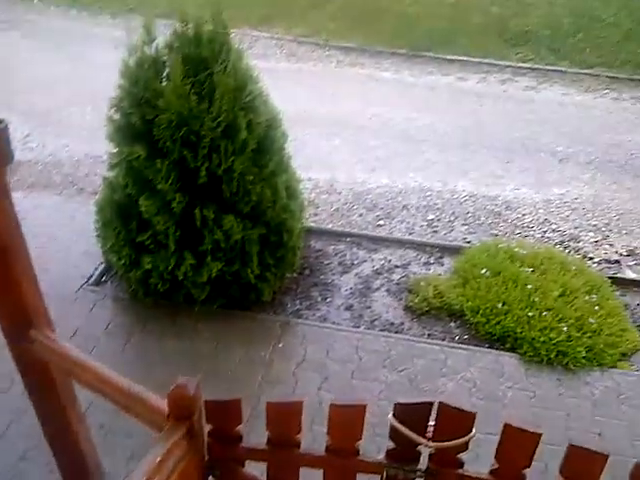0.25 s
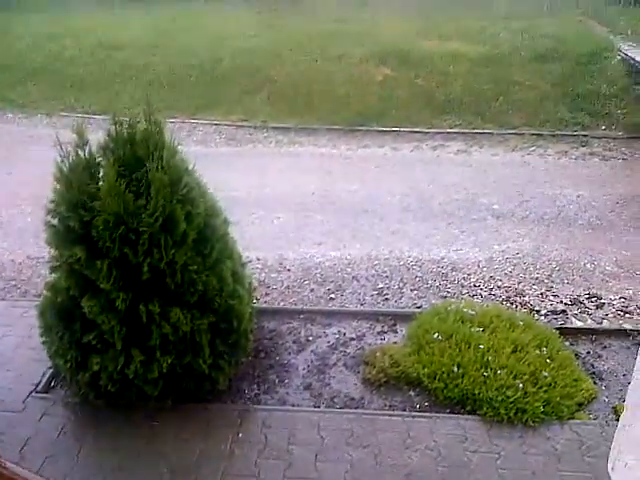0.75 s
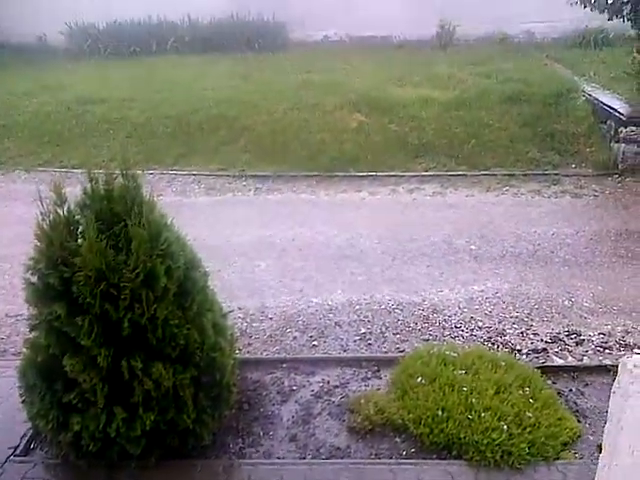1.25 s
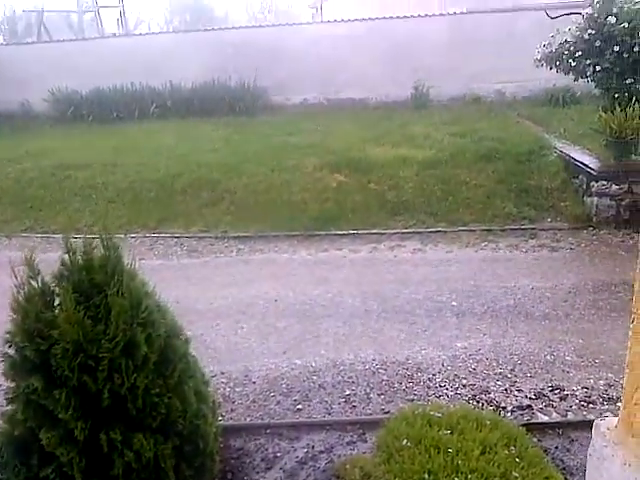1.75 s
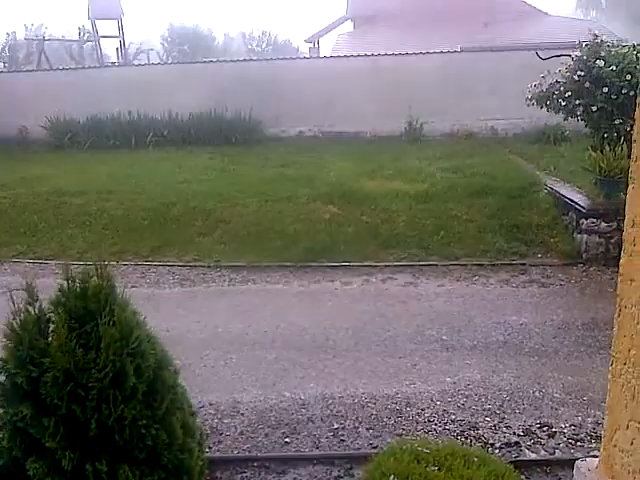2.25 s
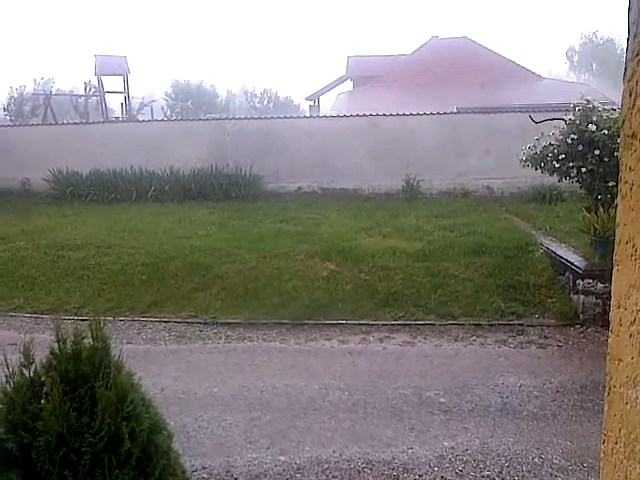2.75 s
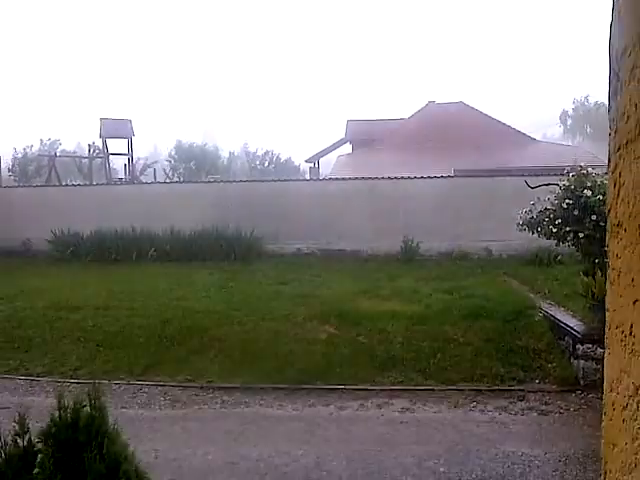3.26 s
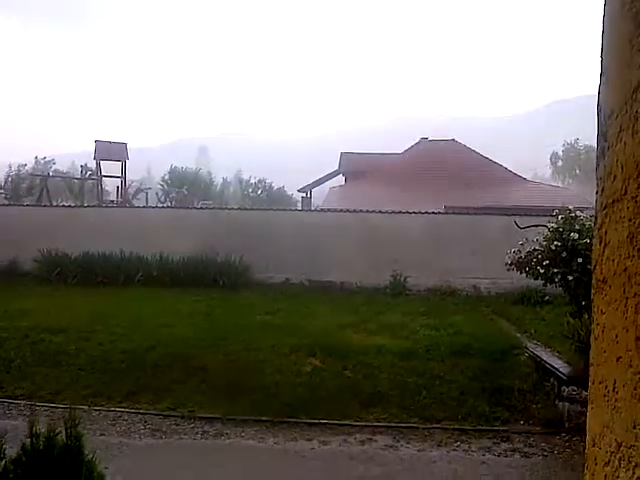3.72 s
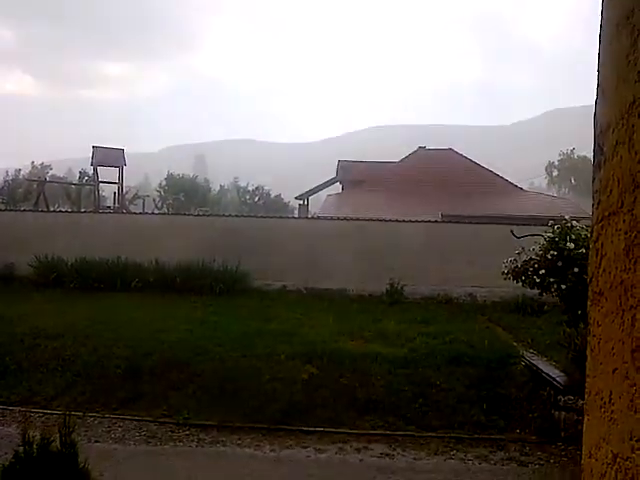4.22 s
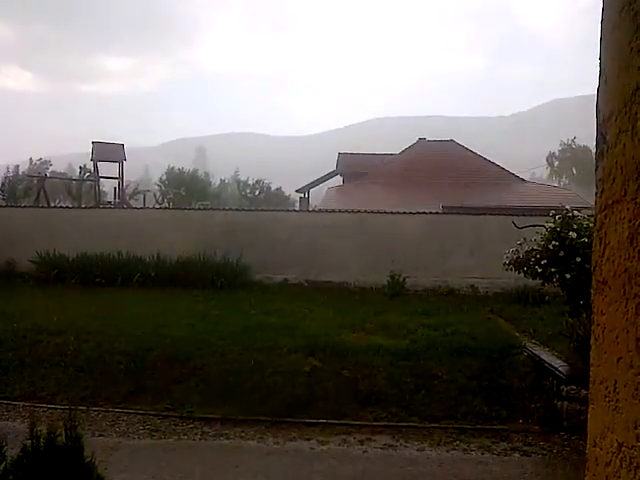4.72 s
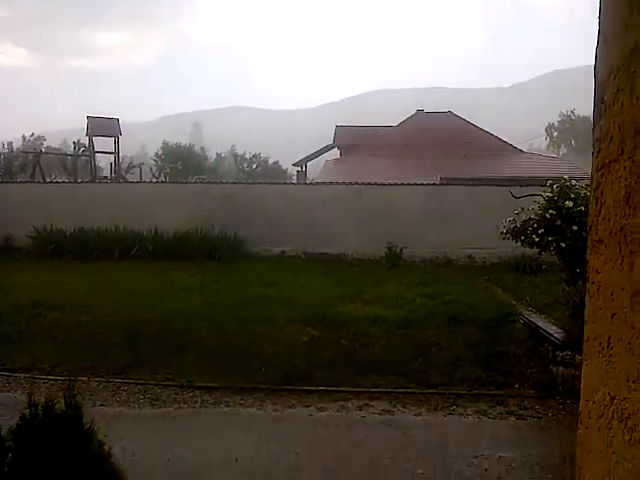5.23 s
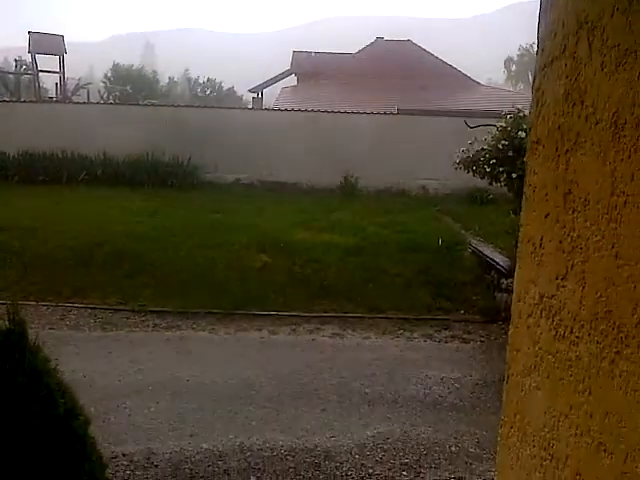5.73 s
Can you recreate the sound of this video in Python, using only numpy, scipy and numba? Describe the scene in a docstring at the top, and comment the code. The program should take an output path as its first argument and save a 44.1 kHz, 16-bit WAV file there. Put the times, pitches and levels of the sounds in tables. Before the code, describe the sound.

Heavy rain pours steadily outside a house, drops pattering on paving and gravel while run-off gurgles and gulps hollowly in a pipe.

```python
"""Porch of a house in a heavy downpour. Far rain is a wash of shaped noise with one narrow ring in it.
Nearer drops patter on paving and gravel: damped rings at random moments, over fine hissing spray.
Puddle bubbles are rings that rise in pitch; listed flurries, spatters and single drops stand out.
Run-off gurgles hollowly, probably in a downpipe: noise through air modes, broken by round gulps."""
import sys
import numpy as np
from scipy import signal
from scipy.fft import rfft, irfft
from scipy.io import wavfile
from scipy.ndimage import uniform_filter1d, map_coordinates
from numba import njit

SR = 44100
rng = np.random.default_rng(int(sys.argv[2]) if len(sys.argv) > 2 else 0)


def store_wav(level_fs):
    """Save 16-bit WAV to argv[1]."""
    pcm = np.round(np.clip(np.atleast_2d(level_fs), -1, 1) * 32767)
    wavfile.write(sys.argv[1], SR, pcm.T.astype(np.int16))


N = 263718

# rain strength, drives roar, patter, spray, far puddles and trickle: (time [s], level [dB])
RAIN_STRENGTH = [(0.0, -36.5), (0.45, -37), (1.05, -36.5), (1.95, -37.5), (2.8, -36), (3.15, -37.0),
                 (3.7, -38.5), (4.2, -39.5), (4.38, -38.0), (4.65, -38.5), (5.25, -38.5), (5.41, -37.5),
                 (5.62, -38.5), (5.98, -38)]
RAIN_USUAL_DB = -37.5  # strength at which the base levels hold
# layer level per rain strength [dB/dB]
ROAR_FOLLOWS, PATTER_FOLLOWS, SPRAY_FOLLOWS, TRICKLE_FOLLOWS = 1.77, 0.24, 0.58, 2.4
# base levels [dB]
ROAR_DB, PATTER_DB, SPRAY_DB, TRICKLE_DB = -38.5, -41.5, -52, -46.5
FAR_PLOPS_DB, FAR_PLINKS_DB = -56.5, -76
SPRAY_FADE_DB_PER_S = 0.28  # microphone tilts up, away from the near paving

# filter curve of the far wash: (frequency [Hz], relative gain [dB])
ROAR_COLOUR = [(25, -36), (115, -34), (150, -27), (200, -11.5), (260, -1), (440, 2), (650, 0), (1020, 1),
               (1300, -4), (1900, -5.5), (3500, -26.5), (7000, -48.5)]
# filter curve of slaps on paving: (frequency [Hz], relative gain [dB])
PATTER_COLOUR = [(120, -70.5), (300, -32.5), (700, -19.5), (1250, -6), (1400, -1.5), (1720, -0.4),
                 (1900, -3), (2200, -8), (2800, -11.5), (3600, -21), (7000, -44.5)]
# filter curve of fine droplets: (frequency [Hz], relative gain [dB])
SPRAY_COLOUR = [(1000, -32), (2800, -2.5), (3600, -3), (4200, 1), (4750, 0.5), (5600, -3.5), (6300, -5),
                (6900, -12), (7400, -22), (7900, -49)]
# added midrange of the wash: (time [s], level [dB])
MIDRANGE_LEVEL = [(4.7, -61), (5.4, -47.5), (5.98, -52)]
# narrow ring in the wash: (time [s], centre [Hz], level [dB])
RIDGE_TRACK = [(0, 1675, -52.5), (1.3, 1690, -50.5), (2.1, 1695, -56), (2.7, 1660, -44.5),
               (3.15, 1557, -46.5), (3.6, 1540, -57), (4.5, 1770, -50), (5.98, 1660, -53)]
RIDGE_WIDTH_HZ = 210.0  # of each of two passes

# big bubbles in the nearest puddle: (time [s], peak [dB], starting pitch [Hz])
NEAR_PLOPS = [(.728, -32, 428), (1.142, -31, 445), (2.162, -32.5, 623), (2.735, -34, 585), (5.76, -35, 455)]
NEAR_PLOP_CYCLES = 49.0

# surges of run-off: (start [s], hold [s], level [dB])
RUNOFF_SURGES = [(0.12, 0.044, -40), (0.564, 0.085, -36), (0.84, 0.095, -44.5), (1.155, 0.16, -42),
                 (1.738, .08, -42), (1.973, 0.044, -37), (2.195, 0.089, -45), (2.333, 0.16, -35.5),
                 (2.546, .04, -39), (2.695, 0.19, -40.5), (3.125, 0.062, -37), (3.283, 0.069, -39.5),
                 (3.456, 0.068, -38), (3.655, 0.12, -47.5), (3.895, 0.048, -41.5), (4.942, 0.12, -42),
                 (5.1, 0.085, -41.5), (5.234, 0.11, -41.5), (5.634, 0.021, -37), (5.833, 0.1, -42.5)]
SURGE_ATTACK_S, SURGE_RELEASE_S = 0.012, 0.0071  # e-fold times
# air modes of the pipe: (centre [Hz], width of each of two passes [Hz], gain [dB])
AIR_MODES = [(281, 21, -7), (316, 23, 2.5), (341.4, 24.2, -2.5), (368.3, 34, -3.5), (440.6, 76, -10)]
GURGLE_LOW_HZ, GURGLE_HIGH_HZ, GURGLE_WIDTH_HZ = 289, 356.4, 54.0
FILL_S, FILL_TAKES_S = 2.2, .16  # midpoint and tanh time scale of the gurgle's rise

# bunches of heavier drops on the paving: (start [s], hold [s], level [dB])
DROP_FLURRIES = [(0.12, 0.036, -42), (0.838, 0.038, -43), (1.02, 0.14, -44.5), (1.987, .03, -43),
                 (2.1, 0.068, -41), (3.126, 0.018, -42), (5.385, 0.053, -41), (5.533, 0.022, -42.5)]
FLURRY_ATTACK_S, FLURRY_RELEASE_S = 0.0074, 0.022  # e-fold times, also of spatters

# loudest gulps of the pipe: (time [s], peak [dB], pitch [Hz])
PIPE_GULPS = [(.127, -36, 325), (.163, -33, 315), (.375, -36, 319), (.5, -35, 330), (.578, -35.5, 322),
              (.629, -29.5, 316), (.85, -31, 338), (.936, -37, 312), (1.211, -30, 347), (1.289, -32, 304),
              (1.374, -33.5, 328), (1.473, -31.5, 312), (1.499, -28.5, 316), (1.767, -27.5, 318),
              (1.81, -30.5, 310), (2.036, -40, 326), (2.162, -38, 320), (2.294, -31, 338),
              (2.338, -28.5, 330.6), (2.374, -29.5, 336), (2.41, -29.5, 318.6), (2.448, -27, 357),
              (2.474, -27, 347), (2.616, -24.5, 333), (2.722, -30, 352), (2.757, -31, 375),
              (2.836, -24.5, 344.4), (2.87, -30, 330), (2.93, -31.5, 330), (3.123, -32, 344),
              (3.165, -29, 355), (3.318, -30, 372), (3.496, -35, 350), (3.657, -36, 355), (3.73, -40, 365),
              (3.928, -37, 338), (4.103, -30.5, 347), (4.247, -33.5, 355), (4.319, -34, 358),
              (4.445, -36, 360), (4.59, -41, 359), (4.725, -37.5, 364), (4.87, -38, 363),
              (4.951, -28.5, 363), (4.99, -30, 346.5), (5.035, -31, 332), (5.108, -31, 346.5),
              (5.146, -28.5, 372), (5.247, -34, 360), (5.331, -31, 362), (5.356, -26.5, 370),
              (5.646, -28, 362), (5.718, -31.5, 335), (5.884, -35.5, 340)]
GULP_SWELL_S = 0.0086  # from peak to 1/e
GULP_CHOKE = .7  # share of the gurgle shut off at the peak of a gulp

# single drops close by: (time [s], peak [dB], starting pitch [Hz], ring [cycles])
NEAR_DRIPS = [(.495, -37, 6900, 30), (.598, -37, 5500, 20), (.853, -35, 6100, 25), (.963, -39, 5600, 70),
              (.967, -39.5, 3580, 49), (1.409, -38, 6100, 40), (1.498, -38, 5740, 35),
              (1.77, -40, 3950, 40), (2.114, -35, 4130, 30), (2.145, -37, 4130, 35), (2.829, -37, 3850, 42),
              (2.9954, -32, 4850, 32), (3.057, -34.5, 5780, 44), (4.4466, -30, 4350, 20),
              (5.307, -34.5, 2950, 41), (5.715, -33.5, 3790, 22)]
DRIP_GLIDE = .04  # pitch rise [share]
DROPLET_MAX_DB = -11  # relative to the drop
DROPLET_DELAY_SPREAD_S, DROPLET_PITCH_RATIO = .024, 1.22
WALL_ECHO_S, WALL_DB = 0.0033, -10.5

# bursts of fine drops: (start [s], hold [s], level [dB])
FINE_SPATTERS = [(0.576, .03, -55.5), (0.847, .06, -55), (1.262, .05, -57.5), (2.49, .02, -58),
                 (5.48, .015, -56)]

TOP_HZ = 7800


def undb(db):
    """Decibels to gain."""
    return 10 ** (np.asarray(db) / 20)


def unit(x):
    """Scale to rms 1."""
    return x / np.sqrt(np.mean(x ** 2))


def curves(table):
    """Interpolate the columns of (time, ..) rows to one value a sample."""
    s, *columns = np.transpose(table)
    return [np.interp(np.arange(N) / SR, s, c) for c in columns]


def walk(rate_hz):
    """Smooth random wandering through normal knots, spread near 1."""
    knots = rng.standard_normal(size=2048)
    return map_coordinates(knots, [np.arange(N) / SR * rate_hz], order=2, mode="mirror")


def band(x, low_hz, high_hz, order=3):
    """Zero-phase Butterworth band-pass."""
    sos = signal.butter(order, [low_hz, high_hz], "bandpass", fs=SR, output="sos")
    return signal.sosfiltfilt(sos, x, padtype=None)


def envelope(start_s, hold_s, attack_s, release_s):
    """Exponential swell up to the start, hold, exponential decay."""
    t = np.arange(N) / SR - start_s
    before = np.maximum(-t / attack_s, 0)
    after = np.maximum((t - hold_s) / release_s, 0)
    return np.exp(-np.minimum(before + after, 20))


def colour(x, points):
    """Filter by a (Hz, dB) curve, linear in log frequency, then scale to rms 1."""
    hz, db = np.transpose(points)
    bins_hz = np.maximum(np.fft.rfftfreq(N, 1 / SR), 1)
    gain = undb(np.interp(np.log(bins_hz), np.log(hz), db))
    return unit(irfft(rfft(x) * gain, N))


@njit
def resonance(x, hz, width_hz):
    """State-variable band-pass with a moving centre."""
    y, b, l = np.empty(len(x)), 0., 0.
    for i in range(len(x)):
        g, k = np.tan(np.pi * hz[i] / SR), width_hz / hz[i]
        v = (b + g * (x[i] - l)) / (1 + g * (g + k))
        b, l, y[i] = 2 * v - b, l + 2 * g * v, k * v
    return y


@njit
def grains(start_s, hz, cycles, size, glide):
    """Damped rings: 60 dB down in their cycles while the pitch rises by the share glide."""
    out = np.zeros(N)
    for k in range(len(start_s)):
        first, length = int(start_s[k] * SR), cycles[k] * SR / hz[k]
        for i in range(min(int(length), N - first)):
            age = i / length
            phase = 2 * np.pi * cycles[k] * age * (1 + glide * age / 2)
            out[first + i] += size[k] * np.exp(-6.9 * age) * np.sin(phase)
    return out


def shower(rate_hz, low_hz, high_hz, mean_cycles, spread_db, glide=0.):
    """Rings at random moments and pitches, with exponentially spread dB levels; rms 1."""
    when, pitch, ring, near = rng.random((int(rate_hz * N / SR), 4)).T
    hz = low_hz + (high_hz - low_hz) * pitch
    nearness = np.minimum(-np.log(1 - near), 6)
    size = undb(spread_db * nearness) * np.sqrt(hz)
    return unit(grains(when * N / SR, hz, mean_cycles * (.5 + ring), size, float(glide)))


def roar(gust_db):
    """Far rain on grass and roofs, blurred into wavering noise; late on, its midrange fills out."""
    level_db = ROAR_DB + ROAR_FOLLOWS * gust_db + 0.41 * walk(8.3)
    wash = colour(rng.standard_normal(N), ROAR_COLOUR) * undb(level_db)
    midrange = unit(band(rng.standard_normal(N), 930, 1470))
    return wash + midrange * undb(curves(MIDRANGE_LEVEL)[0])


def ridge():
    """Narrow ring that shifts as the microphone turns, probably a hollow of the porch: resonated noise."""
    hz, db = curves(RIDGE_TRACK)
    ring = resonance(rng.standard_normal(N), hz, RIDGE_WIDTH_HZ)
    ring = resonance(ring, hz, RIDGE_WIDTH_HZ)
    return unit(ring) * undb(db)


def patter(gust_db):
    """Drops slap on wet paving and gravel: dense short rings."""
    slaps = shower(rate_hz=6000, low_hz=595, high_hz=4420, mean_cycles=11.5, spread_db=1.25)
    level_db = PATTER_DB + PATTER_FOLLOWS * gust_db + 0.18 * walk(12)
    return colour(slaps, PATTER_COLOUR) * undb(level_db)


def spray(gust_db):
    """Droplets of broken splashes tick on the stones, their level flickering, over the hiss of those further
    off."""
    ticks = shower(rate_hz=3000, low_hz=2920, high_hz=8220, mean_cycles=14, spread_db=1.34)
    flicker = undb(1.3 * walk(30))
    hiss = undb(6.5) * rng.standard_normal(N)
    fade_db = SPRAY_FADE_DB_PER_S * (np.arange(N) - N / 2) / SR
    level_db = SPRAY_DB + SPRAY_FOLLOWS * gust_db - fade_db + 0.23 * walk(13)
    return colour(ticks * flicker + hiss, SPRAY_COLOUR) * undb(level_db)


def puddles(gust_db):
    """Trapped air bubbles ring and rise in pitch: big ones plop, tiny ones plink; a few plop close by."""
    plops = shower(rate_hz=56, low_hz=426.0, high_hz=1500, mean_cycles=29, spread_db=2.0, glide=0.03)
    plinks = shower(rate_hz=55, low_hz=2580, high_hz=6490, mean_cycles=100, spread_db=-0.5, glide=0.044)
    far = band(plops, 380, 1900) * undb(FAR_PLOPS_DB) + band(plinks, 2000, 6200) * undb(FAR_PLINKS_DB)
    s, db, hz = np.array(NEAR_PLOPS, float).T.copy()
    near = grains(s, hz, np.full(len(s), NEAR_PLOP_CYCLES), undb(db), 0.044)
    return far * undb(gust_db) + band(near, 330, 900)


def flow(gust_db):
    """Run-off level: surges power-summed with a trickle that grows with the rain."""
    trickle = undb(TRICKLE_DB + TRICKLE_FOLLOWS * gust_db)
    power = trickle ** 2
    for s, hold_s, db in RUNOFF_SURGES:
        power = power + (undb(db) * envelope(s, hold_s, SURGE_ATTACK_S, SURGE_RELEASE_S)) ** 2
    return np.sqrt(power)


def downpipe(gust_db):
    """Falling water stirs the pipe's air modes as loudly as it flows; the gurgle rises as the pipe fills."""
    filled = .5 + .5 * np.tanh((np.arange(N) / SR - FILL_S) / FILL_TAKES_S)
    gurgle_hz = GURGLE_LOW_HZ + (GURGLE_HIGH_HZ - GURGLE_LOW_HZ) * filled
    air = 0
    for hz, width_hz, db in AIR_MODES:
        stir = resonance(rng.standard_normal(N), gurgle_hz, GURGLE_WIDTH_HZ)
        centre_hz = np.full(N, float(hz))
        mode = resonance(stir, centre_hz, float(width_hz))
        mode = resonance(mode, centre_hz, float(width_hz))
        air = air + undb(db) * mode
    # the unbroken stream keeps the air ringing fairly evenly
    swell = np.sqrt(uniform_filter1d(air ** 2, size=2200) + 1e-12)
    gurgle = unit(air / swell ** 1.1) * flow(gust_db)
    return band(gulps(gurgle), 267, 700)


def flurries():
    """Bunches of heavy drops land together: gated slaps."""
    slaps = shower(rate_hz=1800, low_hz=1010, high_hz=2226, mean_cycles=11, spread_db=3.0)
    bunches = sum(undb(db) * envelope(s, hold_s, FLURRY_ATTACK_S, FLURRY_RELEASE_S)
                  for s, hold_s, db in DROP_FLURRIES)
    return colour(slaps, PATTER_COLOUR) * bunches


def gulps(gurgle):
    """Slugs of water choke the gurgle, each swelling into one round sine note."""
    t = np.arange(N) / SR
    notes, choke = 0, 0
    for s, db, hz in PIPE_GULPS:
        slug = np.exp(-np.minimum(((t - s) / GULP_SWELL_S) ** 2, 20))
        notes = notes + slug * undb(db) * np.sin(2 * np.pi * (hz * t + rng.random()))
        choke = np.maximum(choke, slug)
    return gurgle * (1 - GULP_CHOKE * choke) + notes


def drips():
    """Single drops tick close by; each throws up four later droplets, and the house wall answers."""
    s, db, hz, cycles = np.array(NEAR_DRIPS, float).T.copy()
    ticks = grains(s, hz, cycles, undb(db), DRIP_GLIDE)
    for late, pitch, weak in rng.random(size=(4, 3, len(s))):
        landing_s = s + DROPLET_DELAY_SPREAD_S * (.1 + late)
        droplet_hz = hz * DROPLET_PITCH_RATIO ** (2 * pitch - 1)
        size = undb(db + DROPLET_MAX_DB) * (1 - weak / 2)
        ticks = ticks + grains(landing_s, droplet_hz, cycles, size, DRIP_GLIDE)
    t = np.arange(N) / SR
    echo = undb(WALL_DB) * np.interp(t - WALL_ECHO_S, t, ticks)
    return band(ticks + echo, 2200, 7000, order=8)


def spatters():
    """Sheets of fine drops hit the near paving: gated high ticks."""
    ticks = shower(rate_hz=700, low_hz=3530, high_hz=7240, mean_cycles=16, spread_db=3.0)
    sheets = sum(undb(db) * envelope(s, hold_s, FLURRY_ATTACK_S, FLURRY_RELEASE_S)
                 for s, hold_s, db in FINE_SPATTERS)
    return colour(ticks, SPRAY_COLOUR) * sheets


def scene():
    """Sum all layers in one channel; the rain swells and eases around its usual strength."""
    gust_db = curves(RAIN_STRENGTH)[0] - RAIN_USUAL_DB
    wash = roar(gust_db) + ridge()
    paving = patter(gust_db) + flurries() + spray(gust_db) + spatters()
    water = puddles(gust_db) + downpipe(gust_db)
    return (wash + paving + water + drips())[None]


def record(dry):
    """Narrow-band phone microphone: a steep elliptic low-pass cuts the top."""
    return signal.sosfilt(signal.ellip(8, .2, 70, TOP_HZ, fs=SR, output="sos"), dry)


dry = scene()
out = record(dry)
store_wav(out)
```